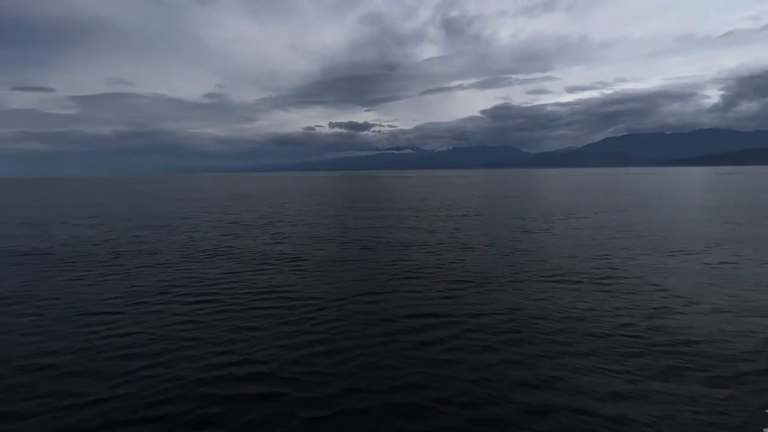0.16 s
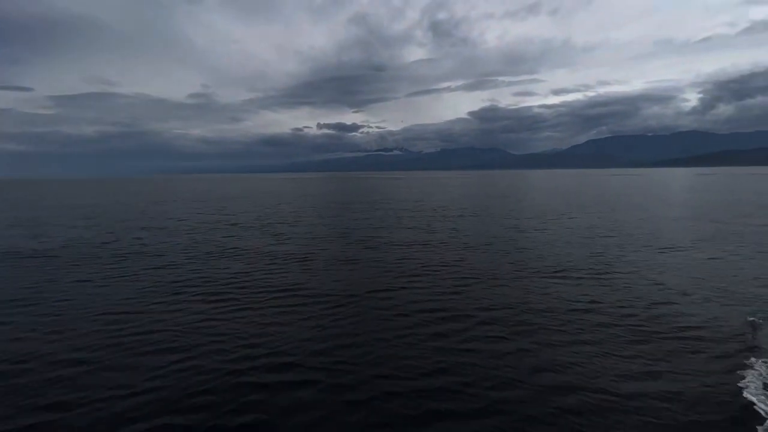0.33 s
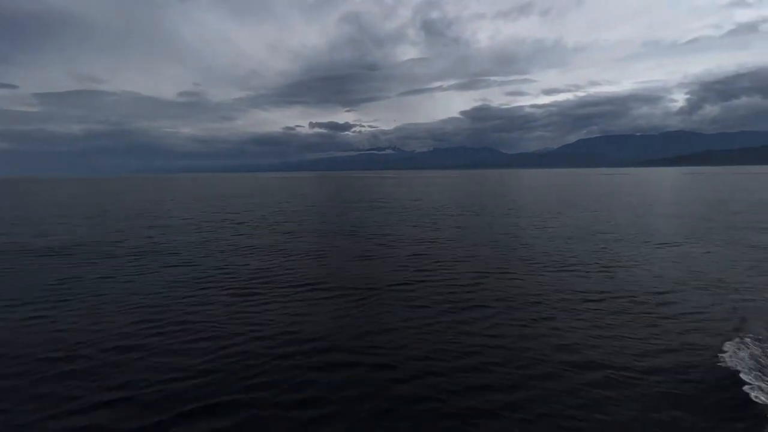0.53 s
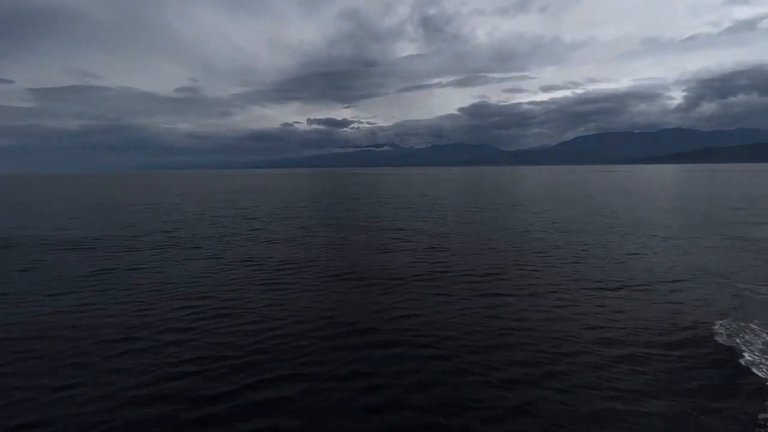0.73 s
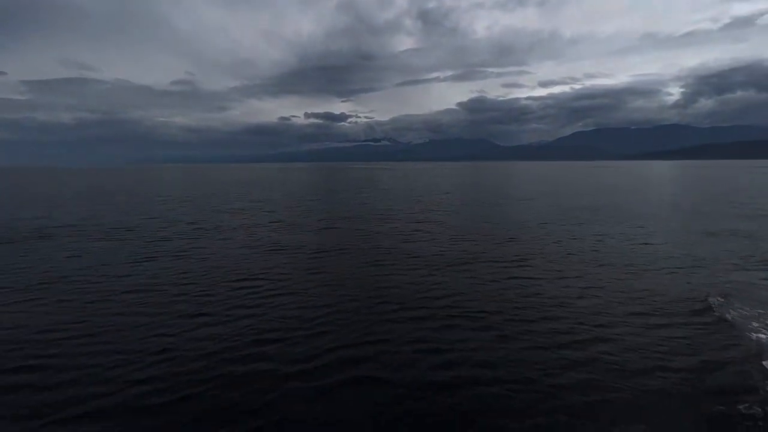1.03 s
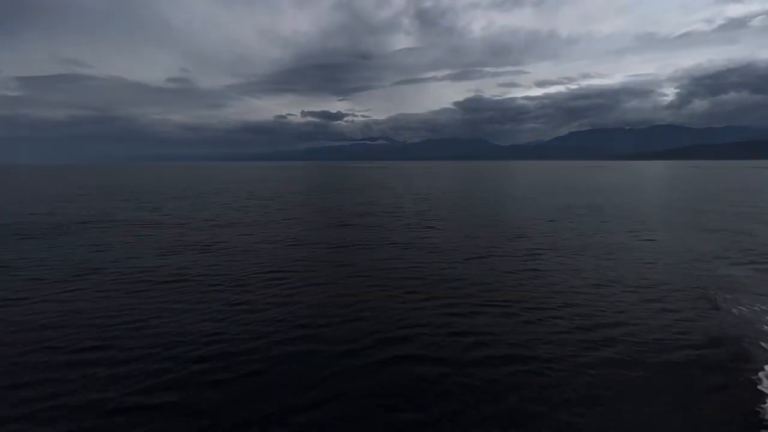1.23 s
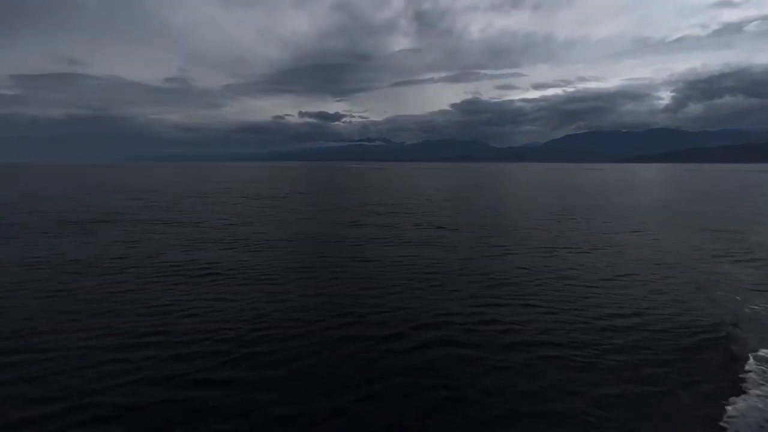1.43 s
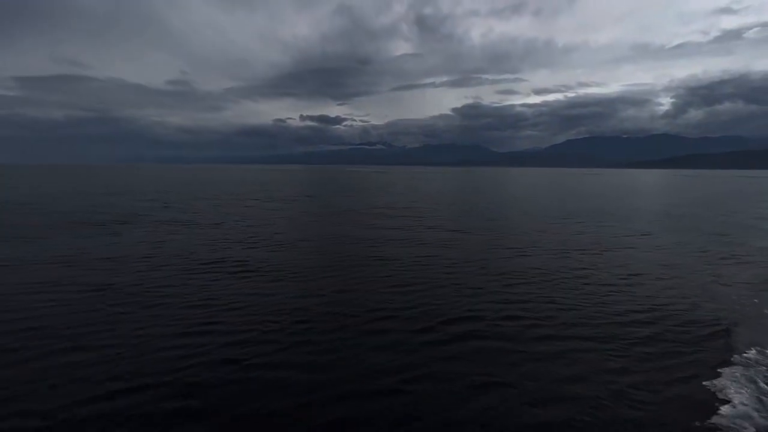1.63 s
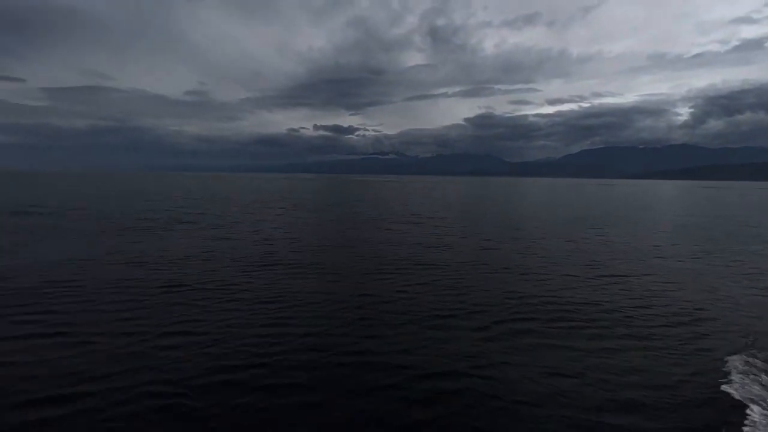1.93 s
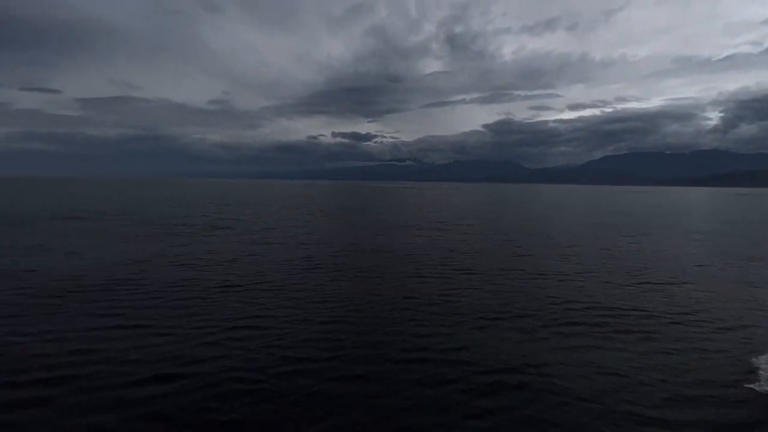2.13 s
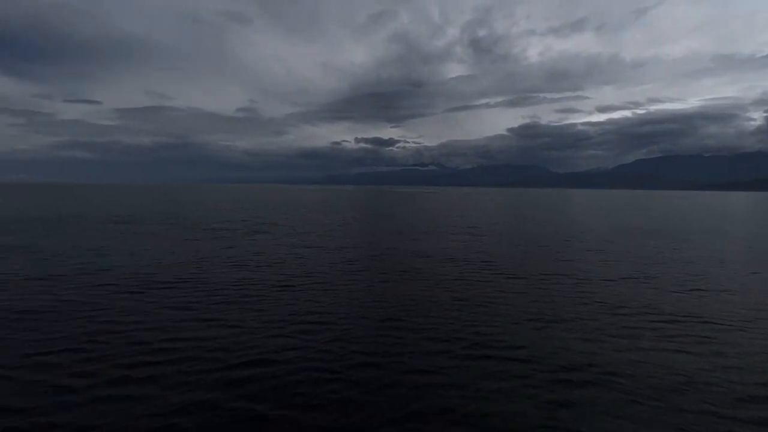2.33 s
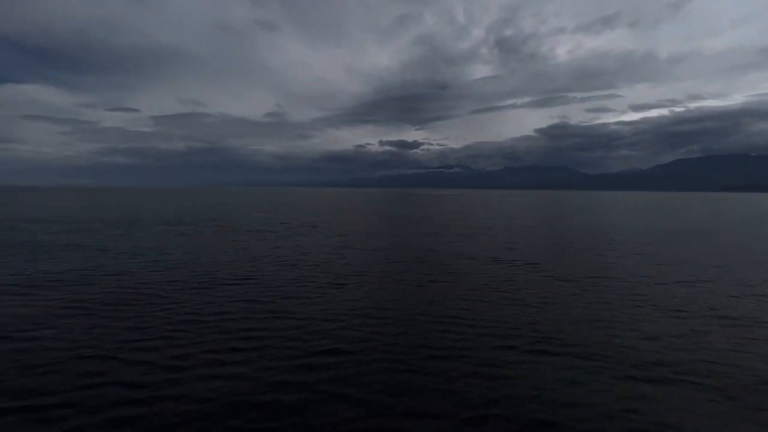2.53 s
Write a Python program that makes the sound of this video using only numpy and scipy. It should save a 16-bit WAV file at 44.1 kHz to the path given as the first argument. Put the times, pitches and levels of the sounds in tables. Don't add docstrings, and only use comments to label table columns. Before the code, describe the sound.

Water rushes along the hull of a moving boat over steady engine drone and wind buffeting; a wave thumps the side, gurgles follow, then the wake breaks into foamy spray and settles. Close stereo microphones near the rail.

```python
import sys
import numpy as np
from scipy import signal
from scipy.fft import rfft, irfft, next_fast_len
from scipy.io import wavfile
from scipy.ndimage import uniform_filter1d, map_coordinates

SR = 44100
rng = np.random.default_rng(int(sys.argv[2]) if len(sys.argv) > 2 else 0)


def gain_from_db(level_db):
    decades = np.asarray(level_db, float) / 20
    return 10 ** decades


def digitize_waveform(pressure):
    field = np.atleast_2d(pressure).T
    bounded = np.clip(field, -1, 1)
    quanta = np.round(bounded * 32767).astype(np.int16)
    wavfile.write(sys.argv[1], SR, quanta)


N = 117747
TIME = np.arange(N) / SR
LEFT_RIGHT = np.array([[.5], [-.5]])


def unit(x):
    return x / np.sqrt(np.mean(x ** 2) + 1e-20)


def along(points, hz):
    f, v = np.transpose(points)
    return np.interp(np.log(hz + 1), np.log(f + 1), v)


def curves(rows):
    s, *columns = np.transpose(rows)
    return [np.interp(TIME, s, column) for column in columns]


def wobble(rate):
    coarse = np.arange(0, N + 64, 64)
    knots = rng.standard_normal(200)
    return np.interp(np.arange(N), coarse, map_coordinates(knots, [coarse * rate / SR]))


def filtered(x, response):
    m = next_fast_len(N + SR // 10, real=True)
    return irfft(rfft(x, m) * response(np.fft.rfftfreq(m, 1 / SR)), m)[..., :N]


def patchy(patchy_db, sheets=()):
    sheet_octaves = 0.15
    hz, t, z = signal.stft(rng.standard_normal((2, N)), SR, nperseg=512)
    field = uniform_filter1d(rng.standard_normal(z.shape[1:]), size=12, axis=0)
    field = uniform_filter1d(field, size=6, axis=1)
    bright_db = 0
    for s, centre, db, half in sheets:
        octaves = np.log2((hz[:, None] + 1) / centre)
        bright_db = bright_db + db * np.exp(-.5 * ((t - s) / half) ** 2 - .5 * (octaves / sheet_octaves) ** 2)
    return signal.istft(z * gain_from_db(patchy_db * unit(field) + bright_db), SR, nperseg=512)[1][:, :N]


# (frequency [Hz], left-right [dB])
SHADOW = [(200, 1), (800, 6.5), (1200, 7.5), (2300, 3.5), (4000, 6), (6900, 12), (8800, -3), (10800, -1.5)]


def ports(pair, spectrum, alike, lead):
    m = next_fast_len(N + SR // 10, real=True)
    hz = np.fft.rfftfreq(m, 1 / SR)
    turn = np.arccos(np.clip(along(alike, hz), -1, 1)) / 2
    mid, side = rfft(pair, m) * gain_from_db(along(spectrum, hz)) * [np.cos(turn), np.sin(turn)]
    half = gain_from_db(along(SHADOW, hz) / 2) * np.exp(.5j * along(lead, hz))
    return unit(irfft(np.array([(mid + side) * half, (mid - side) / half]), m)[:, :N])


def grains(strength_db, per_s, hz, spread, cycles, rise, count, size):
    size_db = -0.5
    u, g = rng.random((count, 4)), rng.standard_normal((count, 1))
    odds = np.cumsum(gain_from_db(strength_db))
    at = np.searchsorted(odds, u[:, 0] * odds[-1])
    pitch = hz * np.exp(spread * np.clip(g, -2, 2))
    age = np.arange(size) / SR * pitch / cycles
    sounding = u[:, 2] * count < per_s * N / SR
    gain = gain_from_db(-size_db * np.log(0.089 + u[:, 1])) * sounding
    wave = np.sin(2 * np.pi * cycles * age * (1 + rise * age))
    wave = gain[:, None] * wave * age ** .5 * np.exp(-2 * age)
    where = at[:, None] + np.arange(size) + (u[:, 3:] < .5) * (N + size)
    streams = np.bincount(where.ravel(), wave.ravel(), 2 * (N + size)).reshape(2, -1)
    return unit(streams[:, :N])


# (frequency [Hz], level [dB rms], left-right [dB])
ENGINE_ORDERS = [(72.5, -24.5, -1), (138.4, -39.5, 5.5), (143.8, -42.5, -12.5), (44.1, -42.5, -2),
                 (226, -46.5, 3)]


def engine():
    wander_db, drift_rad, lead_rad = -2, 0.41, 0.34
    drone = np.zeros((2, N))
    for hz, db, pan in ENGINE_ORDERS:
        level = np.sqrt(2) * gain_from_db(db + pan * LEFT_RIGHT + wander_db * wobble(5.95))
        drift = drift_rad * hz / ENGINE_ORDERS[0][0] * wobble(4.25)
        drone += level * np.sin(2 * np.pi * hz * TIME + drift + lead_rad * LEFT_RIGHT)
    return drone


# (time [s], level on the left port [dB], level on the right port [dB])
GUSTS = [(0, -20.5, -27.5), (.12, -24, -19), (.2, -30, -27.5), (.3, -25, -24), (.52, -28.5, -26.5),
         (.72, -27.5, -21.5), (.86, -23, -19.5), (1, -30.5, -26.5), (1.2, -22.5, -18), (1.38, -25.5, -27.5),
         (1.47, -17, -22.5), (1.6, -30.5, -29), (1.76, -20, -18), (1.96, -20.5, -22.5), (2.1, -22, -20.5),
         (2.26, -29, -25), (2.44, -18.5, -25), (2.67, -26.5, -22)]
# (frequency [Hz], level [dB per Hz])
BUFFET = [(25, -42), (42, -1), (100, -1), (150, -5), (250, -8), (400, -13), (700, -24.5), (1500, -54)]


def wind():
    lumps_db, buffet_db = 0.4, -1.5
    lumps = gain_from_db(lumps_db * np.array([wobble(13), wobble(14)]))
    rumble = ports(patchy(patchy_db=0.1), BUFFET, [(60, -.05), (300, 0.33)], [(1, 0.01)])
    return gain_from_db(buffet_db + np.array(curves(GUSTS))) * unit(lumps * rumble)


# (time [s], peak level [dB], frequency [Hz], left-right [dB], extra
KNOCKS = [(.596, -11.5, 166, -3, 1.3), (.62, -21, 237, 3, 0.69), (.792, -15.5, 82, -6, 0.63),
          (.836, -19, 89, 5, 0.23), (.768, -32, 184, 15, 1.8), (0.11, -22.5, 145, 5, 0.23),
          (2.55, -19, 180, -1, 0.24), (0.98, -31, 96, 6, .2), (1.3, -22.5, 222, -4, 0.38),
          (1.751, -20, 110, 0, .3), (1.796, -18, 110, -10.5, 0.17), (2.1, -23, 380, -4, .2),
          (1.6, -25, 165, -11, .3), (1.927, -18, 130, -9, 0.36), (1.941, -18, 165, 15.5, 0.35),
          (1.7, -26, 105, -9, .3), (2.3, -18.5, 122, 0, 0.33), (1.3, -22, 210, 11, 0.23),
          (1, -18.5, 230, -2, 0.25), (2.41, -22, 186, 10, 0.44), (2.1, -16, 370, -5, .4)]


def knocks():
    length_cycles, sag_cycles = 1.24, 0.28
    out, t = np.zeros((2, N + SR)), np.arange(SR // 10) / SR
    for s, db, hz, pan, sag in KNOCKS:
        u = t * hz / length_cycles
        turns = hz * t + sag * sag_cycles * (1 - np.exp(-hz * t / sag_cycles))
        wave = np.e * u ** 0.92 * np.exp(-u / 2 - u * u / 2) * np.sin(2 * np.pi * turns)
        start = round(s * SR)
        out[:, start:start + len(t)] += gain_from_db(db + pan * LEFT_RIGHT) * wave
    return out[:, :N]


# (time [s], peak level [dB], frequency [Hz], left-right
# [dB])
GURGLES = [(.235, -35, 1266, 9), (.262, -35, 484, 8), (.44, -43, 2636, -3), (.452, -37.5, 618, 6),
           (.453, -37.5, 810, -9), (.585, -41, 1073, -5), (.712, -19.5, 154, -3), (.735, -21.5, 144, -1),
           (.76, -29.5, 436, 14.5), (1.09, -27, 308, 0), (1.16, -23.5, 221, 0), (1.79, -26, 399, -4),
           (.885, -34, 740, 6), (1.425, -43, 2280, -5), (1.495, -26.5, 880, -4), (1.497, -40, 1540, 0),
           (1.54, -36.5, 2700, 3), (1.57, -30.5, 727, 7), (1.74, -43, 2180, 6), (1.86, -45, 675, 0),
           (1.91, -25.5, 327.4, -3), (2.36, -33, 635, 9), (2.49, -29.5, 440, 0), (2.498, -44, 2694, 8),
           (2.59, -36, 1397, 2), (2.632, -33.5, 1258, 7)]


def gurgles():
    swell_s, rise = 0.0079, 0.048
    out, t = np.zeros((2, N + SR)), np.arange(SR // 10) / SR
    u = t / swell_s
    for s, db, hz, pan in GURGLES:
        wave = u * np.exp(1 - u) * np.sin(2 * np.pi * hz * t * (1 + rise * u / 2))
        start = round(s * SR)
        out[:, start:start + len(t)] += gain_from_db(db + pan * LEFT_RIGHT) * wave
    return out[:, :N]


# (time [s], level [dB])
SURGE = [(0, -32), (.16, -34), (.25, -31), (.36, -33), (.55, -31), (.8, -33.5), (1.12, -33.5), (1.54, -28),
         (1.7, -29), (1.9, -29.5), (2.27, -31.5), (2.62, -29.5)]
# (frequency [Hz], level [dB per Hz])
WASH = [(150, -0.5), (700, -2.5), (1100, -6), (1550, -10.5), (1750, -9), (2650, -12.5), (3100, -28),
        (8000, -42)]
# (frequency [Hz], likeness [-1 to 1])
ALIKE = [(300, 0.25), (1000, 0.46), (1800, 0.48), (2250, 0.68), (2800, 0.22), (4400, 0.24), (5600, 0.14),
         (7500, 0.25)]
# (frequency [Hz], left leads [rad])
LEAD = [(300, -0.5), (600, 2), (1400, 1.72), (2200, 3), (4000, 8.5), (5000, 8.5), (6100, 14.5), (8000, 11)]


def hull_wash():
    bubble_db = -8
    (surge_db,) = curves(SURGE)
    bubbles = grains(surge_db, per_s=200, hz=854, spread=0.401, cycles=9.04, rise=0.148, count=600, size=1600)
    rush = ports(patchy(patchy_db=1.1), WASH, ALIKE, LEAD)
    return gain_from_db(surge_db) * (rush + gain_from_db(bubble_db) * ports(bubbles, [(1, 0)], ALIKE, LEAD))


# (time [s], centre [Hz], brightening [dB], half length [s])
SHEETS = [(.5, 2290, 5, .06), (.6, 1910, 5, .06), (.47, 5200, 3, 0.088), (1.2, 1500, 3.5, .05),
          (1.27, 2300, 3.5, .06), (1.3, 3600, 2.5, .06), (1.5, 4300, 1.5, .03), (1.56, 3050, 3.5, .04),
          (1.73, 2850, 3, .05), (1.9, 2590, 4.5, .06), (2.03, 2650, 3, 0.047), (2.3, 1400, 4.5, 0.17)]


def broken_water(swing_db):
    drop_db = -13.5
    hiss = unit(patchy(patchy_db=0.98, sheets=SHEETS))
    drops = grains(swing_db, per_s=1400, hz=4630, spread=0.61, cycles=0.95, rise=0, count=4000, size=96)
    return unit(hiss + gain_from_db(drop_db) * drops)


# (time [s], level [dB])
CREST = [(0, -39), (.08, -43), (.22, -45), (.36, -44), (.5, -41.5), (.58, -41), (.77, -43.5), (.95, -43.5),
         (1.11, -44.5), (1.2, -38.5), (1.4, -37), (1.54, -35.5), (1.72, -34.5), (1.83, -36), (2, -36.5),
         (2.15, -39), (2.36, -44), (2.67, -42)]
# (time [s], flare over the crest [dB], half width [s])
SPLASHES = [(.275, 2, .02), (.445, 2, .02), (1.0, 1.5, .015), (1.235, 1.5, .015), (1.425, 1.5, .012),
            (1.49, 1.5, .012), (1.548, 1.5, .02), (1.77, 2, .02), (1.873, 3.5, .012), (2.002, 2, .012),
            (2.31, 2.5, .025), (2.49, 2, .02), (2.58, 1.5, .02)]
# (frequency [Hz], level [dB per Hz])
FOAM = [(300, -44), (550, -3), (900, -1), (2100, -5), (2900, -4.5), (4300, -7.5), (7200, -13.5),
        (8200, -46)]
# (frequency [Hz], level [dB per Hz])
SPRAY = [(6500, -54), (7400, 1.5), (9000, 2.5), (10700, -2), (11800, -5), (12900, -12), (13900, -11),
         (15300, -13)]
# (frequency [Hz], likeness [-1 to 1])
SPRAY_ALIKE = [(8000, .2), (9600, .3), (10300, .85), (10800, .97), (11400, .995), (15500, .995)]
# (frequency [Hz], left leads [rad])
SPRAY_LEAD = [(10750, 3.14), (11200, 6.15), (12600, 6.4), (13200, 9.2), (14300, 9.55), (14850, 12.45),
              (15700, 12.6)]


def breaking_crest():
    foam_db, spray_db, spray_follows = 5, -6.5, 0.94
    swings_right = 0.091
    (crest_db,) = curves(CREST)
    mean_db = crest_db.mean()
    flares_db = sum(db * np.exp(-.5 * ((TIME - s) / width) ** 2) for s, db, width in SPLASHES)
    swing_db = crest_db - mean_db + flares_db + .25 * wobble(11)
    lean_db = -swings_right * (crest_db - mean_db) * LEFT_RIGHT
    foam = ports(broken_water(swing_db), FOAM, ALIKE, LEAD)
    spray = ports(broken_water(swing_db), SPRAY, SPRAY_ALIKE, SPRAY_LEAD)
    foam = gain_from_db(foam_db + swing_db + lean_db) * foam
    spray = gain_from_db(spray_db + spray_follows * swing_db) * spray
    return gain_from_db(mean_db) * (foam + spray)


def scene():
    return engine() + wind() + knocks() + gurgles() + hull_wash() + breaking_crest()


def band_limit(x):
    return signal.sosfilt(signal.butter(12, 17100, fs=SR, output="sos"), x)


def record(dry):
    top_hz = 15760
    mix = filtered(dry, lambda hz: hz < top_hz)
    return band_limit(mix)


dry = scene()
out = record(dry)
digitize_waveform(out)
```